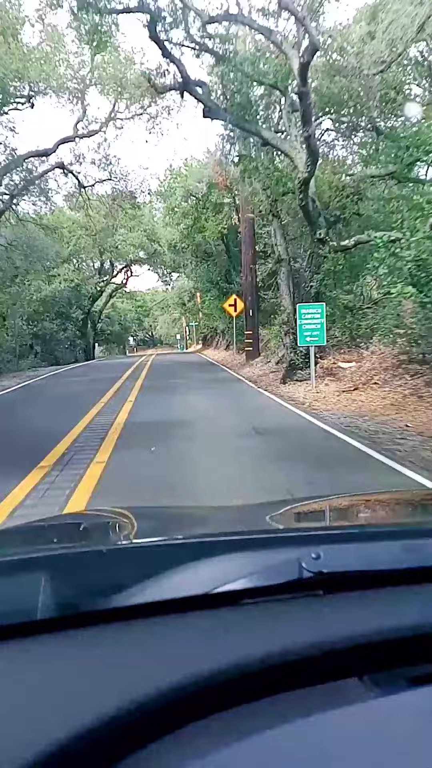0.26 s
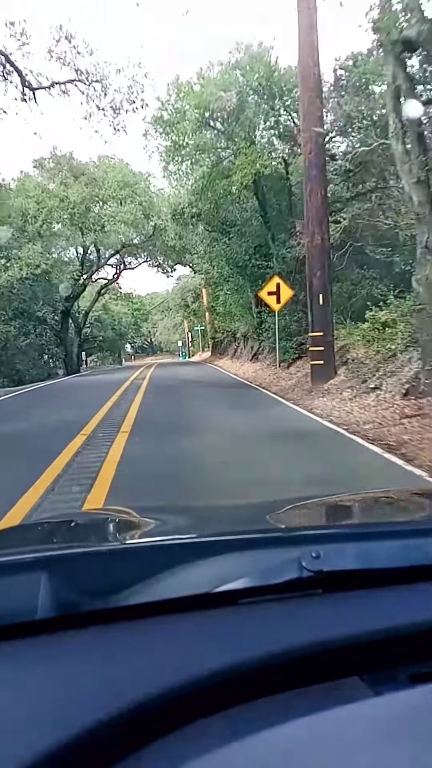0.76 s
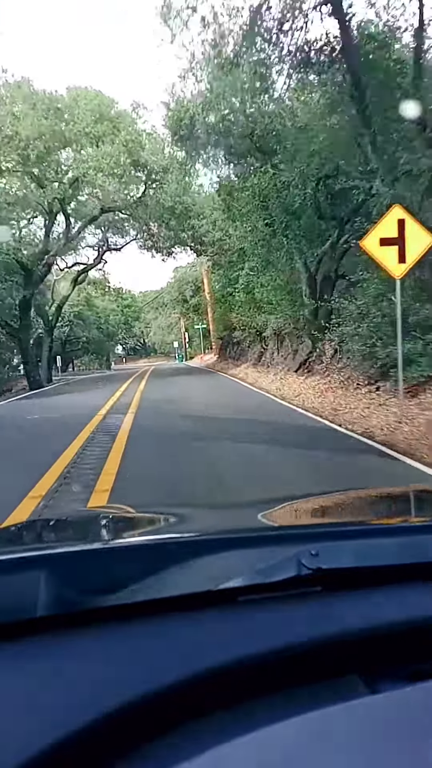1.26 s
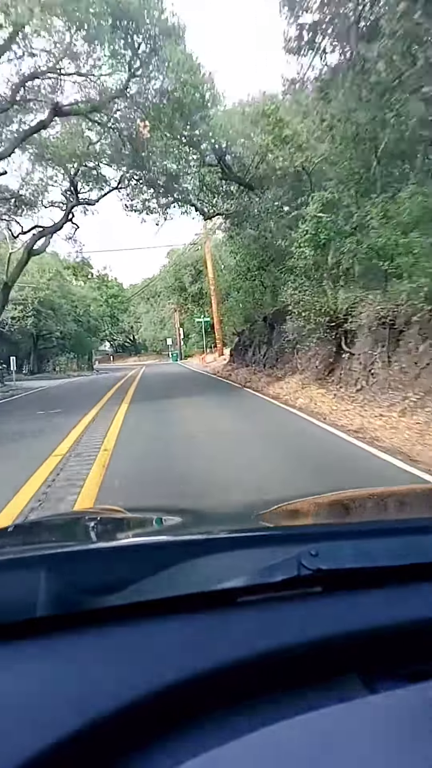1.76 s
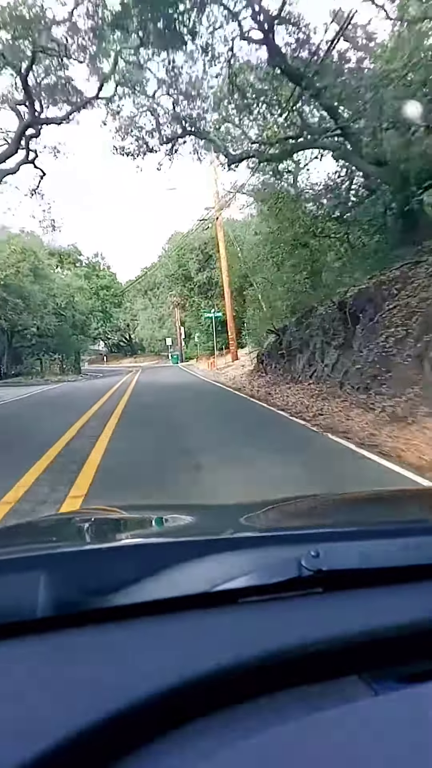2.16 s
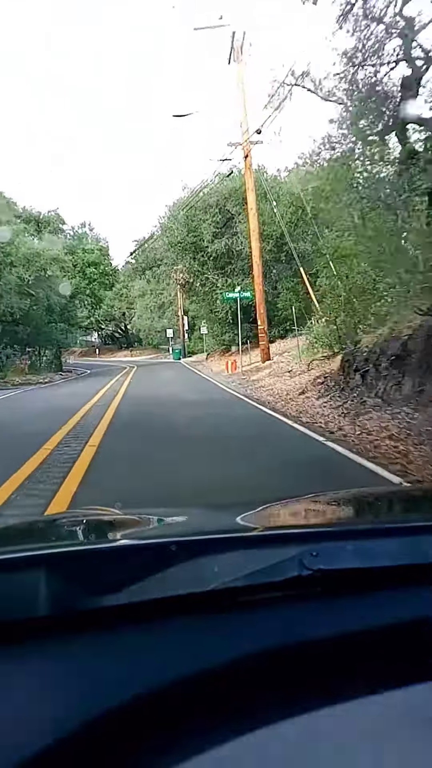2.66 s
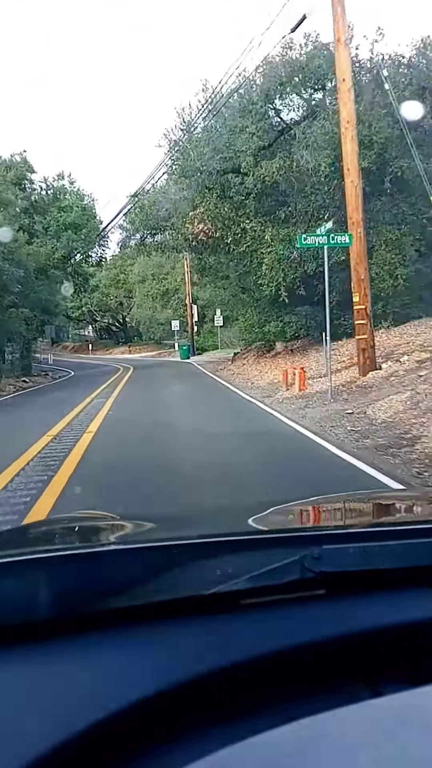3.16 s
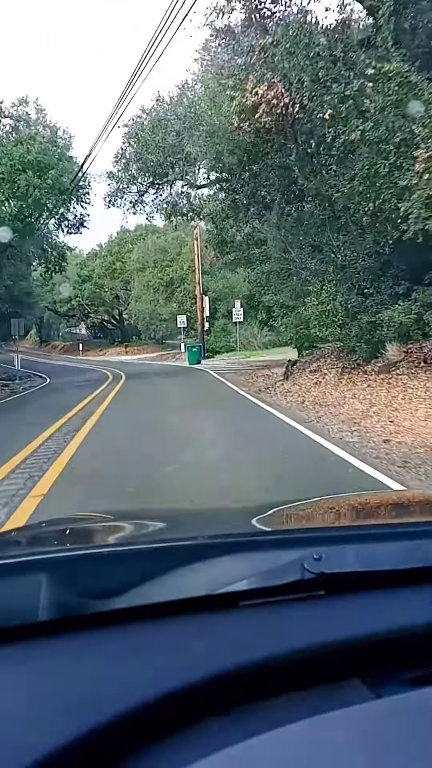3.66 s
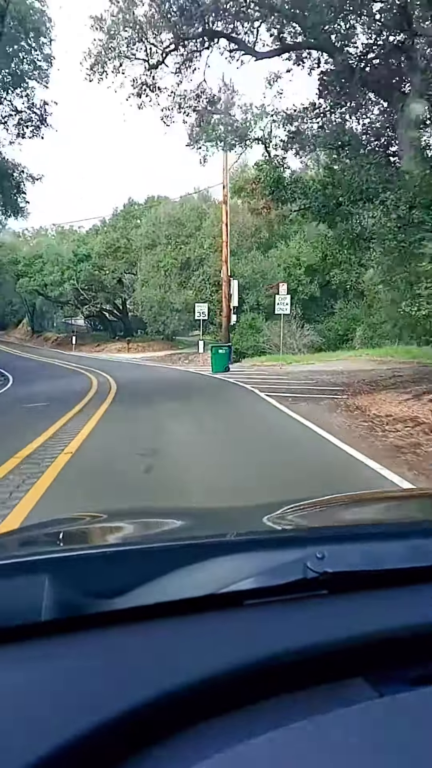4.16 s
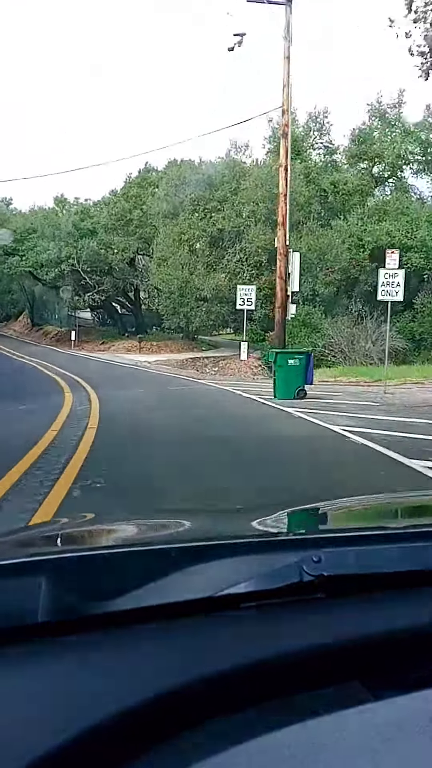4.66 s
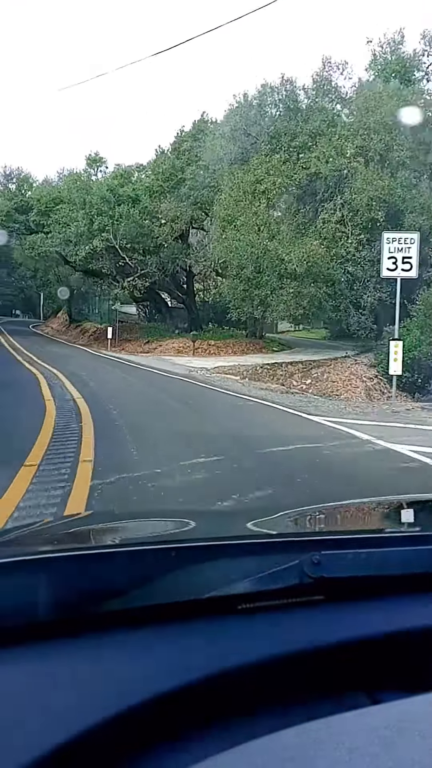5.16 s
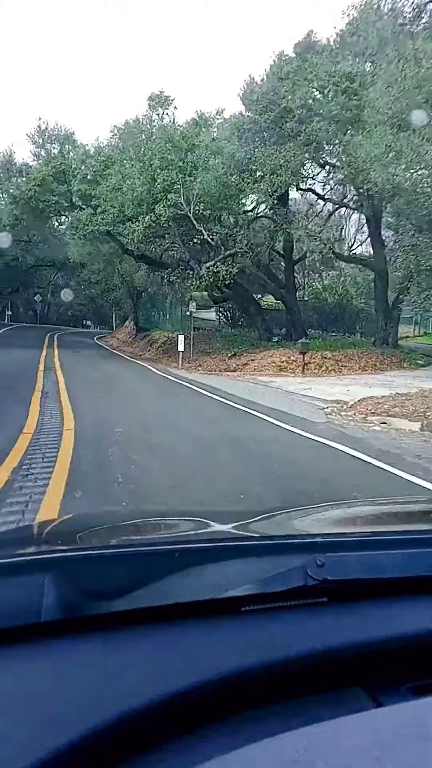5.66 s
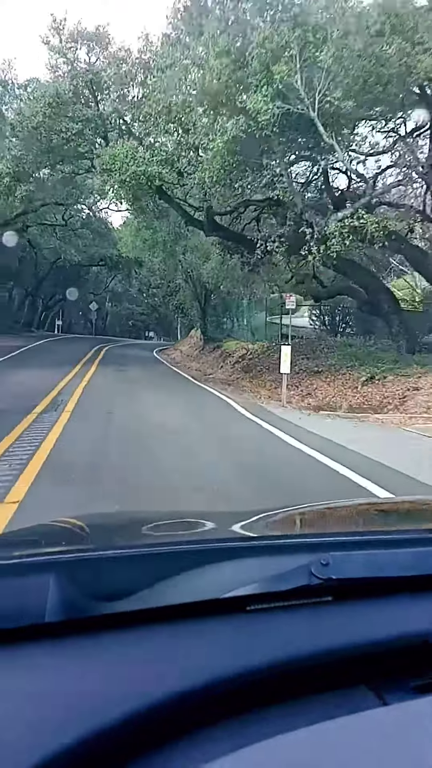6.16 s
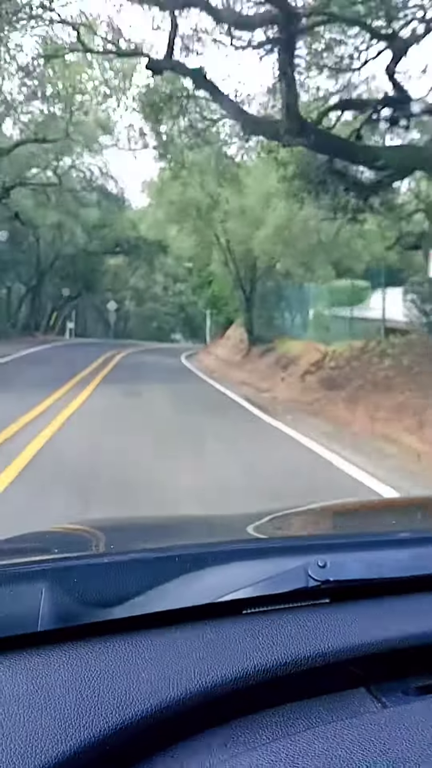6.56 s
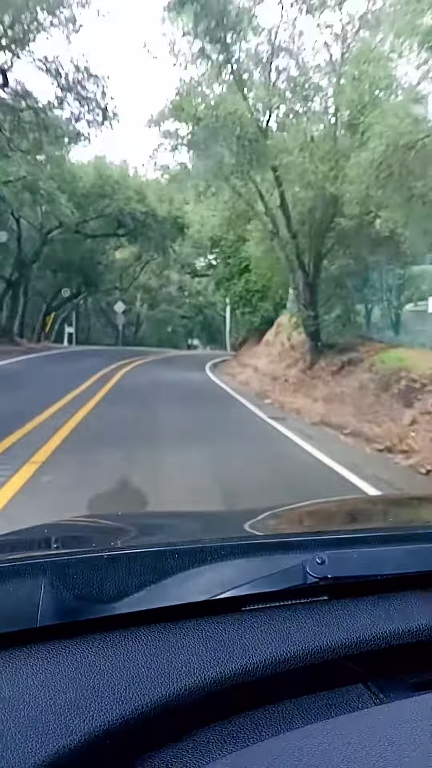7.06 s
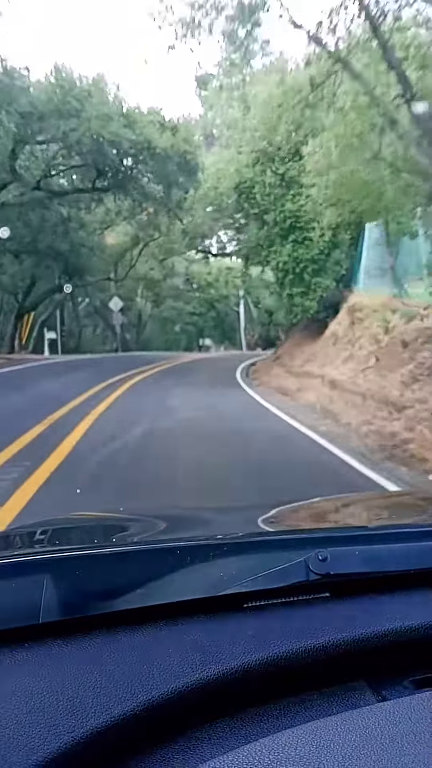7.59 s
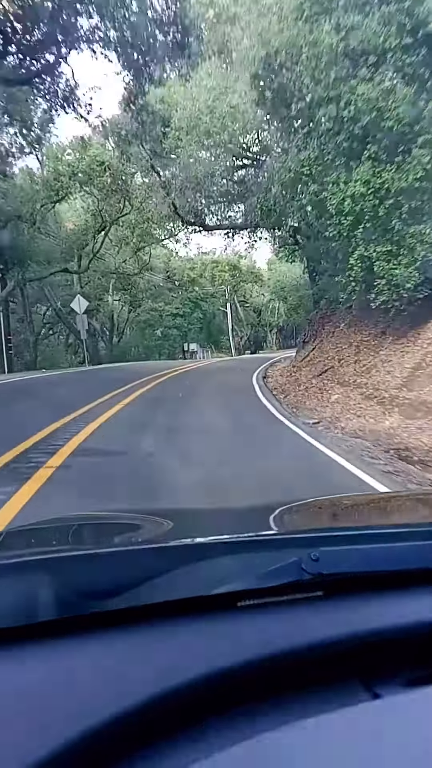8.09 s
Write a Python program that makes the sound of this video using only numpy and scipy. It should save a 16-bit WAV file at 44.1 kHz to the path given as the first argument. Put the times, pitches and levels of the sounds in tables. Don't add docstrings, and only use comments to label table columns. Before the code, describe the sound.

Engine drone and breathy turbo rush under boost, bumps crackling the microphone, one sharp long pressure hiss at throttle lift, then tyre roar.

```python
import sys
import numpy as np
from scipy import signal
from scipy.io import wavfile
from scipy.ndimage import uniform_filter1d

SR = 44100
rng = np.random.default_rng(int(sys.argv[2]) if len(sys.argv) > 2 else 0)


def output_pcm(signal):
    pcm = np.clip(np.atleast_2d(signal).T, -1, 1) * 32767
    wavfile.write(sys.argv[1], SR, np.round(pcm).astype(np.int16))


def how_loud(loudness_db):
    steps = np.asarray(loudness_db, float) / 20
    return 10 ** steps


N = 367353

# (time [s], jet level [dB])
VENT = [
    (2.787, -5.5),
    (2.95, -4),
    (3.2, -7),
    (3.4, -13),
    (3.7, -20.5),
    (4.1, -24.5),
    (4.6, -32),
    (5.3, -40),
    (6.0, -49),
]
VENT_S = VENT[0][0]
# (frequency [Hz], density [dB per Hz])
SIZZLE = [(12500, -30), (13900, -12), (14500, -2), (15600, -5), (16500, -30)]


def evened(x):
    return x / np.sqrt(np.mean(x ** 2) + 1e-20)


def since(s):
    return np.maximum(np.arange(N) / SR - s, 0)


def curves(rows):
    s, *columns = np.transpose(rows)
    return [np.interp(np.arange(N) / SR, s, column) for column in columns]


def gusts(hz):
    steps = rng.standard_normal(N // 64 + 2)
    wander = evened(signal.lfilter([1], [1, -np.exp(-64 * hz / SR)], steps))
    return np.interp(np.arange(N), 64 * np.arange(len(steps)), wander)


def noise(spectrum, patchy_db, size=1024):
    f, db = np.transpose(spectrum)
    hz = np.fft.rfftfreq(size, 1 / SR)
    a, b, patches = rng.standard_normal((4 * N // size + 6, len(hz), 3)).T
    patches = uniform_filter1d(patches, size=10, axis=0)
    patches = evened(uniform_filter1d(patches, size=10, axis=1))
    colour_db = np.interp(np.log(hz + 1), np.log(f + 1), db, left=-90, right=-90)[:, None]
    z = (a + 1j * b) * how_loud(colour_db + patchy_db * patches)
    return evened(signal.istft(z, nperseg=size, noverlap=3 * size // 4)[1][:N])


def resonate(x, hz, width):
    return signal.lfilter(*signal.iirpeak(hz, hz / width, SR), x)


def pipes(air, modes):
    return sum(how_loud(db) * resonate(air, hz, width) for hz, width, db in modes)


def road():
    # (time [s], level [dB])
    roughness = [(0.0, -25), (0.17, -24), (0.22, -5.5), (0.39, -17), (0.97, -21.5), (1.86, -27),
                 (2.7, -19.5), (3.6, -21.5), (3.9, -18), (4.5, -15.5), (5.24, -17.5), (7.05, -21),
                 (7.45, -16.5), (7.7, -20), (8.33, -25.5)]
    # (frequency [Hz], density [dB per Hz])
    rumble_colour = [(12, -56), (20, -13), (37, -31), (59, 2), (76, 6.5), (186, 1), (236, 0), (268, -20),
                     (400, -1), (520, -33), (880, -120)]
    roar_colour = [(110, -21), (180, -2.5), (253, -3.5), (285, -5.5), (478, -3.5), (598, -1), (958, -8.5),
                   (1130, -9.5), (1960, -17.5), (3000, -27.5), (3900, -42), (6600, -120)]
    draught_colour = [(900, -40), (1500, -3.5), (2300, -12.5), (3400, -13.5), (4800, -15.5), (6600, -20),
                      (7600, -34), (8400, -39), (10000, -41), (13000, -42.5), (14000, -48), (14500, -42),
                      (15600, -40)]
    # (frequency [Hz], width [Hz], level [dB])
    whistles = [(1585, 80, 0), (2700, 140, -1), (3700, 45, 6), (4790, 80, 1), (6600, 120, 1)]
    rough_db, = curves(roughness)
    texture = gusts(75.0)
    vented = np.minimum(since(VENT_S) / 0.25, 1)

    rumble_db = rough_db - 7.5 * how_loud(curves(VENT)[0]) * vented
    rumble = how_loud(rumble_db + 2.3 * texture) * noise(rumble_colour, patchy_db=0.5, size=4096)

    roar_db = -17.5 + 0.33 * (rough_db + 20) - 5 * (1 - vented)
    swell_s, swell_length_s = 5.62, 0.45
    roar_db += 2 * np.exp(-((since(0) - swell_s) / swell_length_s) ** 2)
    roar = how_loud(roar_db + 0.5 + 0.65 * texture) * noise(roar_colour, patchy_db=0.5)

    reopening = since(7.26)
    air = noise(draught_colour, patchy_db=0.0, size=512)
    gasp_level = how_loud(4.0) * np.minimum(reopening / 0.041, 1) * np.exp(-reopening / .2)
    gasp = gasp_level * resonate(air, 2650, 300)
    whistling = how_loud(-2.0) * np.clip(reopening / 0.38, .15, 1) * pipes(air, whistles)
    gulp_db = 5 * np.minimum(reopening / 0.13, 1) * np.exp(-reopening / 0.91)
    draught_db = -32 + 0.2538 * since(0) + gulp_db
    draught = how_loud(draught_db + 1.3 * texture) * (air + gasp + whistling)
    return rumble + roar + draught


def jolts():
    # (time [s], level [dB])
    bumps = [
        (.2, -5),
        (.79, -13),
        (1.66, -17),
    ]
    hz, decay_s = 38, .02
    return sum(how_loud(db) * np.sin(2 * np.pi * hz * since(s)) * np.exp(-since(s) / decay_s) for s, db in bumps)


def thumps():
    # (time [s], length [ms], size [capsule folds], place of the fastest point [0-1])
    lurches = [(.005, 6, 1, .5), (.0135, 5, -3, .5), (.180, 6, 3, .3), (.188, 7, -3, .5), (.198, 6, 2, .5),
               (.206, 8, -4, .4), (.216, 6, 1, .5), (.223, 6, 2, .5), (.232, 8, -3, .7), (.242, 6, 2, .4),
               (.2545, 4, -2, .5), (.260, 6, 4, .5), (.2695, 5, -4, .5), (.277, 5, 3, .5),
               (.3235, 4.5, -3, .4), (.335, 3.5, 2, .5), (.787, 8, 7, .2), (.7945, 5, -4, .5),
               (.799, 7, -3, .8), (.8055, 6, 4, .2), (1.6632, 6.5, -5, .2), (1.6705, 4, 3, .4)]
    speed = np.zeros(N)
    for s, ms, folds, fastest in lurches:
        u = np.arange(0, 1, 1000 / ms / SR)
        shape = np.interp(u, [0, fastest, 1], [0, 1, 0])
        speed[round(s * SR):][:len(u)] += 2 * np.pi * folds * shape / shape.sum()
    return np.cumsum(speed)


def intake(turns):
    # (time [s], level [dB])
    boost = [(0.0, -20), (0.33, -18.5), (0.45, -14), (0.8, -13), (0.89, -14.5), (1.21, -12.5),
             (2.46, -12.5), (2.77, -11.5)]
    # (frequency [Hz], density [dB per Hz])
    rush_colour = [(180, -45), (300, -17), (360, -12), (391, -2), (431, -14.5), (526, -4), (821, -12),
                   (1200, -8.5), (1700, -9), (1940, -15), (2570, -17.5), (2880, -5.5), (5130, -6),
                   (7750, -22.5), (15500, -24.5)]
    # (frequency [Hz], width [Hz], level [dB])
    intake_modes = [(557, 52, -5), (1096, 330, 5), (1648, 65, 4), (2184, 105, 8.5), (2760, 140, -2),
                    (3410, 39, -16), (3740, 54, -39), (4530, 73, -19), (4560, 290, -29), (4850, 350, -7),
                    (5620, 73, -16), (5880, 730, 2.5), (6400, 97, 1.5)]
    level_db, = curves(boost)
    air = noise(rush_colour, patchy_db=0.5)
    air = evened(air + pipes(air, intake_modes))
    sizzle_db = -24 - 1.5 * since(0) - level_db
    air = air + how_loud(sizzle_db - 5) * noise(SIZZLE, patchy_db=1.0)
    puff_depth = np.clip(0.19 + 0.08 * (-11 - level_db), 0, 1)
    puffs = 1 + puff_depth * np.cos(2 * np.pi * turns - 1.5)
    throttle = np.clip((VENT_S + 0.062 - np.arange(N) / SR) / 0.017, 0, 1)
    return how_loud(level_db + 2.0) * air * puffs * throttle


def engine():
    # (time [s], firing rate [Hz], load [dB])
    run = [(0, 110.5, 0), (.3, 110.5, -0.5), (.345, 108.2, 1.5), (.42, 97, -2), (.58, 84.9, 1.5),
           (.7, 80.93, 1.5), (1.03, 79.37, -1.5), (1.62, 75.8, -5.5), (2.08, 78.85, -3), (2.77, 78.2, -3.5),
           (3.3, 77, -10.5), (4.6, 74, -12), (5.06, 73, -1.5), (5.88, 71, -5), (7.22, 66.73, -8.5),
           (7.6, 67.4, -9), (8.33, 68.3, -3.5)]
    # (frequency [Hz], width [Hz], level [dB])
    boom_modes = [(98.3, 26.8, -8), (135.9, 9.76, -9), (225.4, 36.3, -3), (330, 40, -17.5),
                  (398.7, 13, -17.5)]
    off_boost_db = [-7, 1.8, -30.5, -11]
    phases = np.pi * np.array([0, 0.47, 0.46, 0, 0.26])
    hz, load_db = curves(run)
    lull_s, lull_length_s = 7.42, .1
    load_db = load_db - 18 * np.exp(-((since(0) - lull_s) / lull_length_s) ** 4)
    turns = np.cumsum(hz * (1 + 0.0042 * gusts(81.0))) / SR
    vented = np.minimum(since(VENT_S) / .08, 1)

    levels = []
    for order, change_db in zip((1, 2, 3, 5), off_boost_db):
        boom = sum(how_loud(db) / (1 + (2 * (order * hz - f) / width) ** 2) for f, width, db in boom_modes)
        levels.append(20 * np.log10(boom) + load_db + change_db * vented)
    first, second, third, fifth = levels
    fourth = .5 * (second + third) - 21 + 19 * vented

    tones = np.zeros(N)
    for k, db in enumerate([first, second, third, fourth, fifth]):
        wobble_db = 1.5 + 1.0 * gusts(55.0)
        tones += how_loud(db + wobble_db) * np.sin(2 * np.pi * (k + 1) * turns + phases[k])
    return tones, turns


def valve():
    # (frequency [Hz], density [dB per Hz])
    jet_colour = [(200, -42), (350, -32), (600, -9), (1000, -11), (1700, -1), (2800, -1.5), (3400, -7),
                  (4800, -1.5), (5500, -7), (6700, -15), (7200, -20.5), (8000, -25), (13500, -27.5),
                  (15600, -32)]
    # (frequency [Hz], width [Hz])
    horn = [(2160, 190), (4290, 400), (6300, 850), (2350, 900)]
    # (level at opening [dB], level drained [dB], time [s])
    horn_shift = [(-15, -8.5, 0.23), (-16, -4.5, 0.39), (1.5, -8.5, 0.36), (-8, -27, 0.17)]
    # (frequency [Hz], width [Hz], level [dB])
    side_modes = [(1180, 61, -3), (1595, 71, -20), (2342, 73, -19), (3710, 230, 1), (5120, 230, -6.5),
                  (6110, 220, -1)]
    level_db, = curves(VENT)
    jet = noise(jet_colour, patchy_db=1.2, size=512)
    sound = jet + pipes(jet, side_modes)
    choke_db = 3 * np.minimum(level_db + 49, 0)
    for (hz, width), (start_db, end_db, s) in zip(horn, horn_shift):
        ring = evened(resonate(resonate(jet, hz, width), hz, 2 * width))
        ring_db = end_db + (start_db - end_db) * np.exp(-since(VENT_S) / s) + choke_db
        sound = sound + how_loud(ring_db) * ring
    sizzle = how_loud(0.68 * level_db - 13) * resonate(noise(SIZZLE, patchy_db=1.5), 15000, 1500)
    opened = np.clip((np.arange(N) / SR - VENT_S) / 0.0015, 0, 1)
    return how_loud(level_db + .15 * gusts(60.)) * (sound + sizzle) * opened


def cabin(x):
    t = np.arange(4096) / SR
    taps = rng.standard_normal(4096) * np.clip(t / .006, 0, 1) * how_loud(-60 * t / .07)
    taps = signal.lfilter(*signal.butter(1, 1200, "high", fs=SR), taps)
    taps *= how_loud(-7.5) / np.linalg.norm(taps)
    taps[0] = 1
    return signal.oaconvolve(x, taps / np.linalg.norm(taps))[:N]


def pressed(x):
    limit_db, span_ms = -5.5, 0.47
    span = round(span_ms * SR / 1000)
    power = uniform_filter1d(uniform_filter1d(x ** 2, size=span), size=span)
    return how_loud(1.5) * x / (1 + (abs(power) / how_loud(2 * limit_db)) ** 2) ** 0.18


def scene():
    tones, turns = engine()
    hiss = pressed(cabin(intake(turns) + valve()))
    heard = tones + jolts() + hiss + cabin(road())
    return (how_loud(2.5) * heard + thumps())[None]


def band_limit(x):
    return signal.sosfilt(signal.butter(12, 15660, fs=SR, output="sos"), x)


def record(dry):
    ring = how_loud(5.0) * resonate(resonate(dry, 16200, 1500), 16200, 1500)
    dip = how_loud(-10.0) * resonate(dry, 12700, 1900)
    capsule = dry + ring - dip
    corner = .85
    folded = 0.9 * np.arcsin(corner * np.sin(capsule)) / np.arcsin(corner)
    mix = signal.sosfilt(signal.butter(2, 25, "high", fs=SR, output="sos"), folded)
    mix = signal.oaconvolve(mix, signal.firwin(255, 15560, fs=SR)[None], "same")
    return band_limit(np.clip(mix, -1, 1))


dry = scene()
out = record(dry)
output_pcm(out)
```